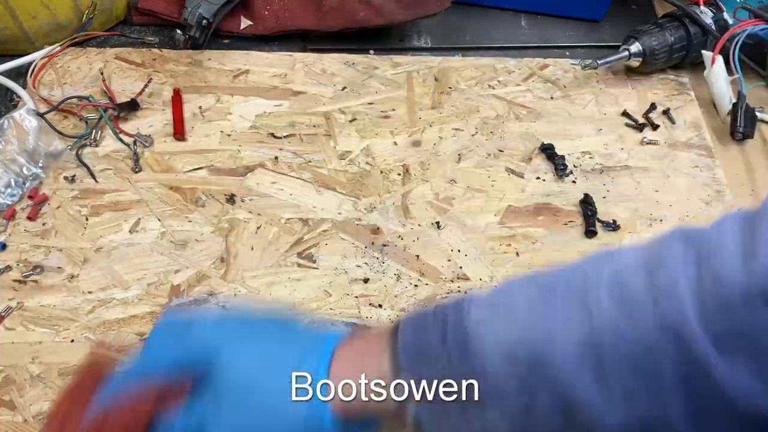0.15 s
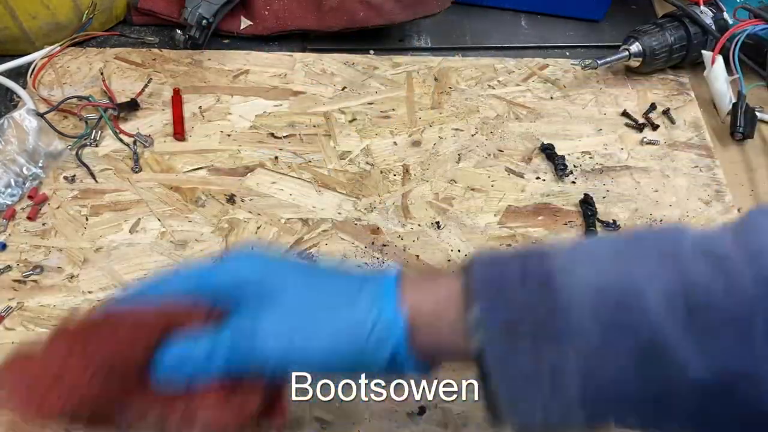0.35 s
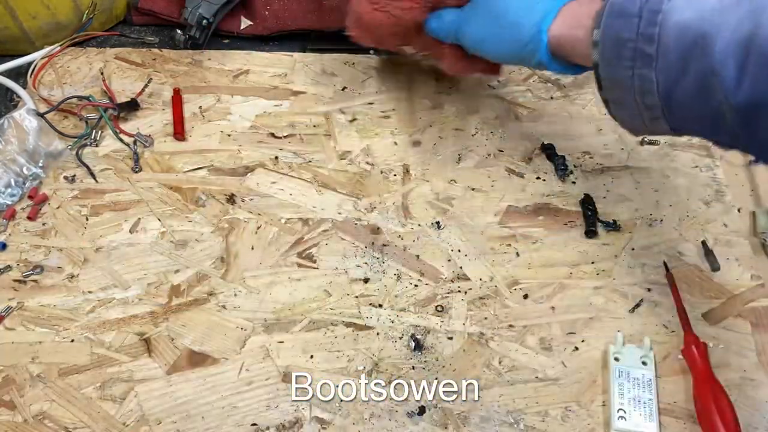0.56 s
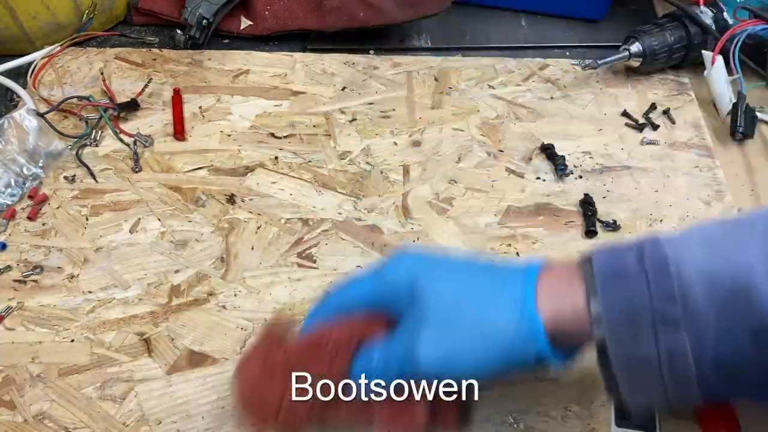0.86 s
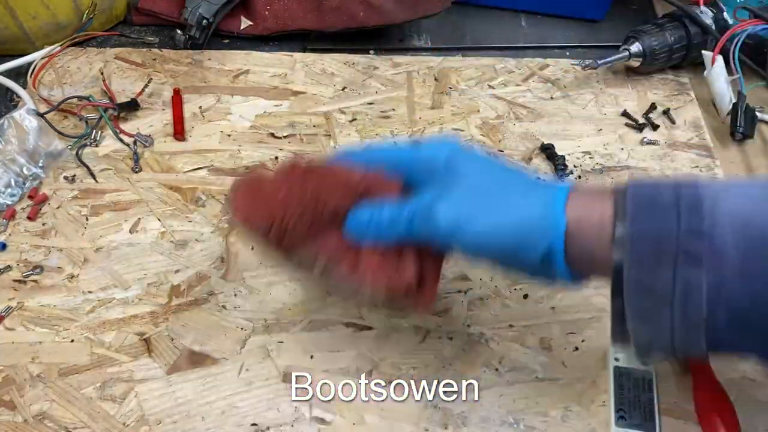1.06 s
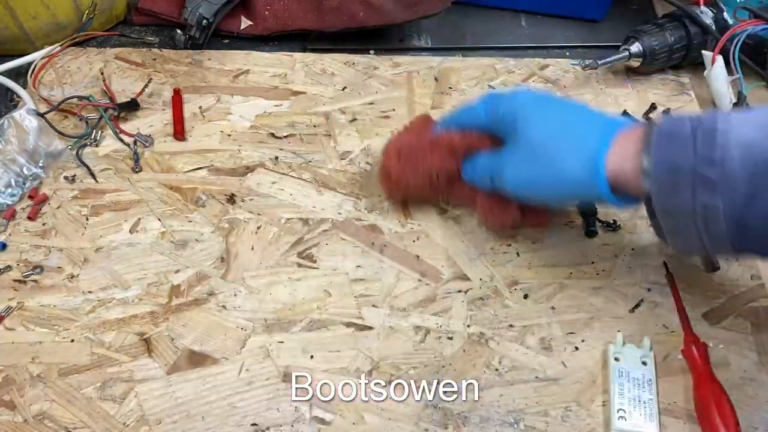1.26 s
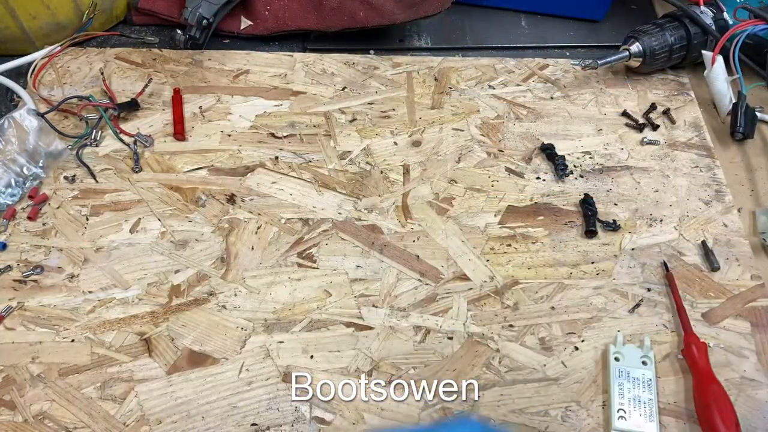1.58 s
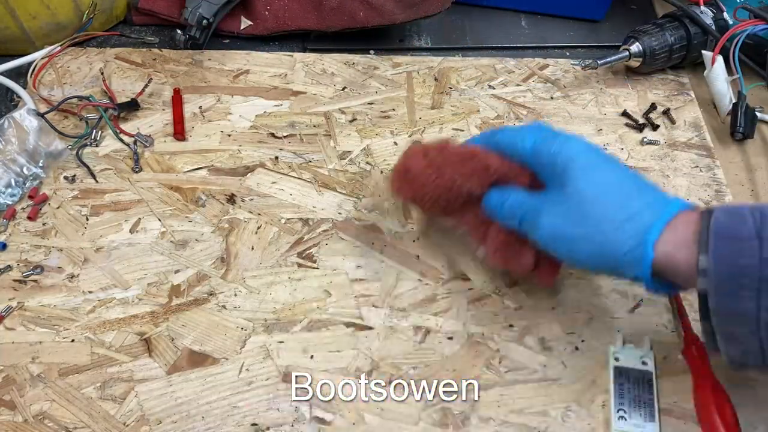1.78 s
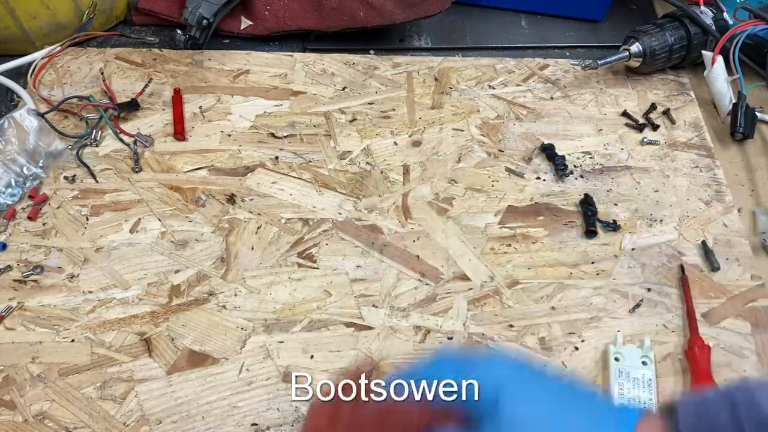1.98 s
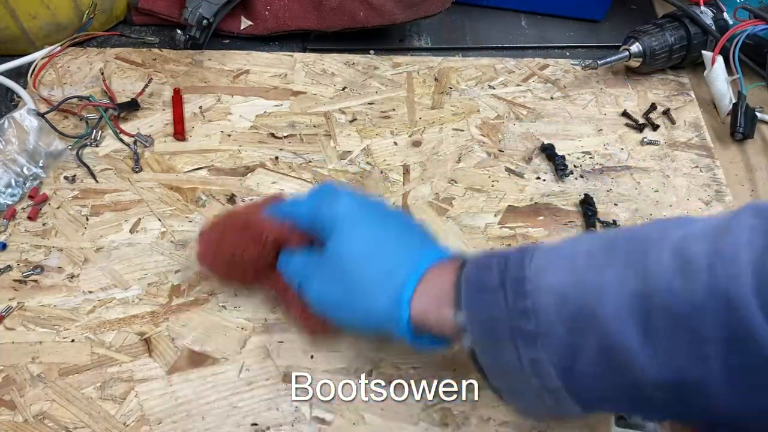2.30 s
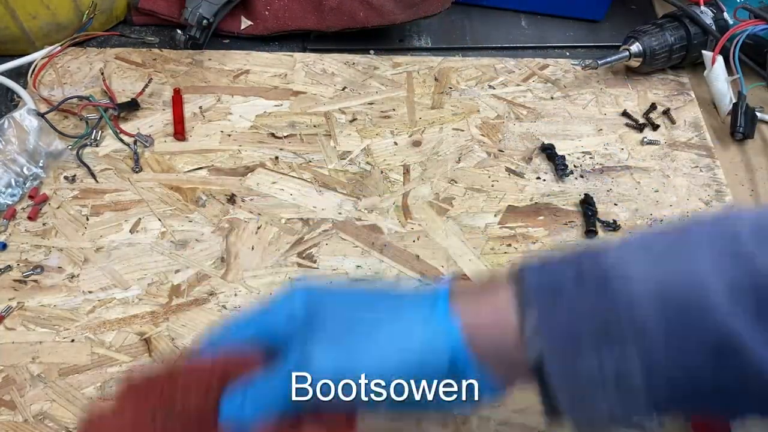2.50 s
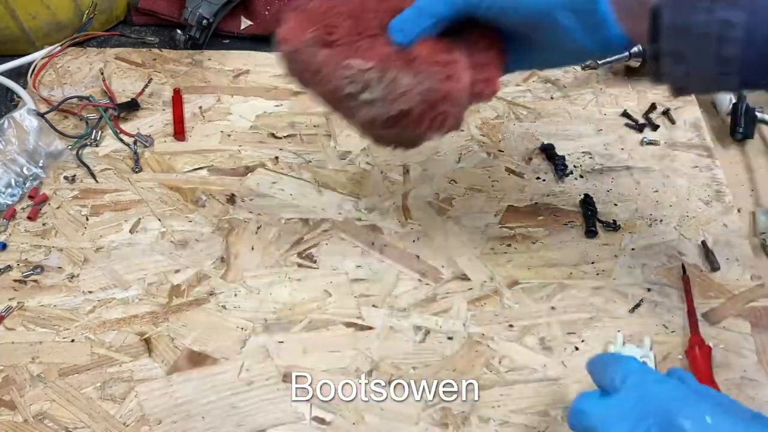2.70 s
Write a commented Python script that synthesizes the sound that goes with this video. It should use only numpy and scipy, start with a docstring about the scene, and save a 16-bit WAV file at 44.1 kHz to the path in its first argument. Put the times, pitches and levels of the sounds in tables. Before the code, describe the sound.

Brisk dry brushing of a cloth across a rough wooden board, with loose crumbs ticking

```python
"""In a small workshop with a low rumble, a gloved hand sweeps shavings off a chipboard bench, close to the microphone.
Five short strokes of a bunched rag: filtered noise rubs the board, hisses in the fibres and scrapes the heap along.
Loose crumbs tick on the wood as clicks with a brief rattle, and gated noise makes the dull thud ending each push.
Softer noise rustles as the sleeve swings back; decaying noise gives the room's answer."""
import sys
import numpy as np
from scipy import signal
from scipy.fft import rfft, irfft, next_fast_len
from scipy.io import wavfile
from scipy.ndimage import uniform_filter1d, map_coordinates

SR = 44100
rng = np.random.default_rng(int(sys.argv[2]) if len(sys.argv) > 2 else 0)


def unload_wav(signal):
    """Save mono or channel-first audio to the path in sys.argv[1] as 16-bit WAV at rate SR, clipped to [-1, 1]."""
    wavfile.write(
        sys.argv[1],
        SR,
        np.round(np.clip(np.atleast_2d(signal).T, -1, 1) * 32767).astype(np.int16),
    )


N = 125685  # samples
T = np.arange(N) / SR  # seconds


def amp(db):
    """Decibels to gain."""
    return 10 ** (np.asarray(db) / 20)


def unit(x):
    """Scale to rms 1."""
    return x / np.sqrt(np.mean(x ** 2) + 1e-20)


def along(points, hz):
    """Read (frequency [Hz], value) points on a log frequency axis."""
    frequency, value = np.transpose(points)
    return np.interp(np.log(hz + 0.0013), np.log(frequency + 1e-3), value)


def wobble(rate):
    """A smooth random curve, rate knots a second."""
    return map_coordinates(rng.standard_normal(2000), [T * rate], mode="wrap")


def filtered(x, response):
    """x times a complex response of frequency."""
    size = next_fast_len(N + 8192)
    spectrum = rfft(x, size) * response(np.fft.rfftfreq(size, 1 / SR))
    return irfft(spectrum, size)[..., :N]


def coloured(x, spectrum):
    """x shaped by the given spectrum, at rms 1."""
    return unit(filtered(x, lambda hz: amp(along(spectrum, hz))))


def gate(start, length, rise, fall):
    """Soft attack, hold and release; rise and fall are time scales in seconds."""
    opening = (1 + np.tanh((T - start) / rise / 2)) / 2
    closing = (1 - np.tanh((T - start - length) / fall / 2)) / 2
    return opening * closing


# Wavering of the rumble in the workshop: (time [s], level [dB])
RUMBLE_LEVEL = [(0, -51), (.15, -51), (.32, -43), (.46, -48), (.7, -48), (1.05, -52), (1.2, -47.5),
                (1.3, -53), (1.42, -50.5), (1.8, -49.5), (1.88, -53), (2.05, -46), (2.33, -50), (2.45, -51),
                (2.53, -44), (2.6, -54), (2.69, -51), (2.76, -63)]
# Spectrum of the rumble: (frequency [Hz], relative level [dB])
RUMBLE_COLOUR = [(20, -29), (36, -40), (45, -14.5), (53, 9.5), (60, -6.5), (72, -4.5), (86, -8),
                 (104, -12.5), (122, -5.5), (145, -22), (250, -26), (400, -36), (800, -106)]
# Spectrum of the air in the room: (frequency [Hz], relative level [dB])
AIR_COLOUR = [(30, -19), (130, 0.5), (250, -2.5), (400, -13), (700, -20), (1300, -20.5), (2500, -32),
              (6000, -36.5), (11000, -35.5), (16000, -40)]
AIR_DB = -64.5


def workshop(rumble_side_db=-21, air_side_db=-9, pan_db=-2.05):
    """A wavering low rumble under faint steady room air: coloured noise, more alike than different at the ports."""
    level = amp(np.interp(T, *np.transpose(RUMBLE_LEVEL)))
    rumble = level * coloured(rng.standard_normal((2, N)), RUMBLE_COLOUR) * amp([[0], [rumble_side_db]])
    air = amp(AIR_DB) * coloured(rng.standard_normal((2, N)), AIR_COLOUR) * amp([[0], [air_side_db]])
    mid, side = rumble + air
    return np.array([mid + side, mid - side]) * amp([[pan_db / 2], [-pan_db / 2]])


# Left-right level difference of the microphone: (frequency [Hz], share of the nominal difference)
PAN_SHAPE = [(300, -.25), (600, .5), (1050, 1.1), (2000, .65), (4000, .3), (7000, 0)]
# Lead of the left port by itself: (frequency [Hz], phase [rad])
PORT_PHASE = [(250, -0.66), (600, 0.84), (1200, -0.29), (3000, -0.088)]
SPLIT_HZ, TREBLE_LAG_S = 5000, .000217


def ports(x, pan_db, lead_ms):
    """Two microphone ports: direction sets the lead below the split; above it the left is inverted and slightly late."""
    def response(hz):
        treble = (1 + np.tanh((hz - SPLIT_HZ) / 400)) / 2
        low_cycles = (1 - treble) * hz * lead_ms / 1000
        treble_cycles = treble * (1.5 - hz * TREBLE_LAG_S)  # the half cycle inverts
        phase = 2 * np.pi * (low_cycles + treble_cycles) + along(PORT_PHASE, hz)
        half = amp(pan_db * along(PAN_SHAPE, hz) / 2)
        return np.array([half * np.exp(1j * phase), 1 / half])
    return filtered(x, response)


# Crumbs that hit the bench, click before colouring: (time [s], level [dB])
TICKS = [(0.045, -35), (0.35, -25.5), (0.384, -34), (0.521, -41), (0.675, -32.5), (1.027, -40),
         (1.074, -40), (1.1285, -35), (1.1435, -32), (1.1614, -6.5), (1.1650, -12.5), (1.6835, -37),
         (2.1745, -26), (2.5501, -17), (2.5535, -34), (2.5705, -27), (2.7878, -28)]
# Spectrum of a crumb on wood: (frequency [Hz], gain [dB])
TICK_COLOUR = [(400, -28), (1200, -14.5), (1700, -19.5), (2600, -10), (4000, -5), (5700, -12), (8000, 3),
               (10300, 6.5), (13000, -6), (16000, -3)]
TICK_RING_DB, TICK_T60_S = -6, 0.034  # rattle energy against the click; time to fall 60 dB


def crumbs():
    """Hard crumbs land: a one-sample click and a very short noise rattle, coloured together."""
    out, t = np.zeros(N + SR), T[:2048]
    for time, db in list(TICKS) + strays():
        tick = rng.standard_normal(len(t)) * amp(-60 * t / TICK_T60_S)
        tick *= amp(TICK_RING_DB) / np.linalg.norm(tick)
        tick[0] += 1
        out[round(time * SR):][:len(t)] += amp(db) * tick
    ticks = filtered(out[:N], lambda hz: amp(along(TICK_COLOUR, hz)))
    return ports(ticks, pan_db=10, lead_ms=0.022)


GRIT_PER_S, GRIT_SHARE = 1500, 0.24  # crumbs caught under the rag: mean rate, share of the power


def friction():
    """Countless fibre slips as noise, with sparser and harder catches of grit as random impulses."""
    grit = (rng.random(N) < GRIT_PER_S / SR) * rng.standard_normal(N)
    fibres = np.sqrt(1 - GRIT_SHARE) * rng.standard_normal(N)
    return fibres + np.sqrt(GRIT_SHARE) * unit(grit)


def wide(width):
    """Friction from a broad patch, a little different at each port; width is side over mid."""
    mid, side = friction(), width * friction()
    return np.array([mid + side, mid - side])


# Resonances of the bench top: (centre [Hz], width [Hz], relative level [dB])
BOARD = [(415, 17, 4.5), (1270, 31, -7.5)]
BOARD_DB = -10  # all resonances against the plain rub


def board(hz):
    """The bench top passes the rub on and adds its resonances."""
    ringing = sum(amp(db) * 1j * hz * width / (centre ** 2 - hz ** 2 + 1j * hz * width)
                  for centre, width, db in BOARD)
    return 1 + amp(BOARD_DB) * ringing


EARLY_DB, EARLY_S = -19, .012  # level of each copy; span of arrivals, from 1 ms on


def nearby(x, count=6):
    """Arm and tools throw back early copies that colour each stroke differently."""
    delays = (.001 + EARLY_S * rng.random(count)) * SR
    gains = amp(EARLY_DB) * rng.choice([-1, 1], count)
    copies = sum(gain * np.pad(x, ((0, 0), (int(delay), 0)))[:, :N] for delay, gain in zip(delays, gains))
    return (x + copies) / np.sqrt(1 + np.sum(gains ** 2))


# Strokes of the rag, levels before swell, roughness and panning: (time the rag lands [s], length [s],
# rise [s], fall [s], hiss [dB], rub [dB], mid-stroke rub centre [Hz], nominal left excess [dB], left lead [ms])
STROKES = [(0.1, 0.16, 0.013, 0.015, -39, -33.5, 1090, 6, 0.16),
           (0.776, 0.19, 0.0082, 0.014, -41.5, -36.5, 1240, 4, 0.072),
           (1.378, 0.2, 0.013, 0.013, -41.5, -36, 1410, 3, 0.048),
           (1.974, 0.11, 0.007, 0.019, -41, -37.5, 1480, 2.5, 0.046),
           (2.411, 0.079, 0.0057, .016, -40, -43, 1350, 9, 0.17)]
# Spectrum of the rub: (multiple of its centre, relative level [dB])
RUB_SHAPE = [(.1, -9.5), (.25, -10.5), (.5, -4), (.8, 1), (1.15, 1), (1.8, -9.5), (3, -19.5), (5, -28),
             (12, -62)]
# Spectrum of the hiss in the fibres: (frequency [Hz], relative level [dB])
FIBRE_COLOUR = [(200, -41), (1000, -2.5), (2800, 0), (5000, -7.5), (7000, -4), (9000, -3), (11500, -4),
                (14000, -9), (16000, -19.5)]
# Spectrum of shavings pushed ahead of the rag: (frequency [Hz], relative level [dB])
SCRAPE_COLOUR = [(1000, -30), (1700, -4), (2500, -5.5), (3600, -2), (5000, -7), (9000, -32)]
ARCH_DB, GLIDE_OCT = 7, 0.43  # weaker at both ends of a stroke; the rub climbs as the rag nears
SCRAPE_DB, SCRAPE_GROWS_DB = -4.5, 15.5  # mid-stroke, over the hiss; growth from start to end
RAG_WIDTH, FIBRE_WIDTH = .2, 0.17  # side over mid


def strokes(rub_rough_db=1.47, scrape_rough_db=2.0, hiss_rough_db=0.77, patchy_db=2):
    """Each stroke: an even hiss, a juddering rub that swells and climbs, and a scrape that grows with the heap."""
    hz, t, slips = signal.stft(filtered(wide(RAG_WIDTH), board), SR, nperseg=512)
    # random patches of time and frequency, the same at both ports
    patches = uniform_filter1d(rng.standard_normal(slips.shape[1:]), size=3, axis=0)
    patches = unit(uniform_filter1d(patches, size=5, axis=1))
    slips = slips * amp(patchy_db * patches)
    hiss = coloured(wide(FIBRE_WIDTH), FIBRE_COLOUR) * amp(hiss_rough_db * wobble(70))
    scrape = coloured(wide(RAG_WIDTH), SCRAPE_COLOUR) * amp(scrape_rough_db * wobble(60))
    judder = amp(rub_rough_db * wobble(110))
    out = np.zeros((2, N))
    for start, length, rise, fall, hiss_db, rub_db, centre_hz, pan_db, lead_ms in STROKES:
        way = np.clip((T - start) / length, 0, 1) - .5  # -0.5 to 0.5 along the stroke
        arch_db = -ARCH_DB * (2 * way) ** 2
        centre = centre_hz * 2 ** (GLIDE_OCT * np.interp(t, T, way))
        shaped = slips * amp(along(RUB_SHAPE, hz[:, None] / centre))
        rub = unit(signal.istft(shaped, SR, nperseg=512)[1][:, :N])
        rub = rub * judder * amp(rub_db + arch_db)
        heap = scrape * amp(SCRAPE_DB + SCRAPE_GROWS_DB * way + arch_db)
        bright = amp(hiss_db) * (hiss + heap)
        stroke = gate(start, length, rise, fall) * (rub + bright)
        out += ports(nearby(stroke), pan_db, lead_ms)
    return out


# Spectrum of the bench top under the hand's push: (frequency [Hz], relative level [dB])
THUD_COLOUR = [(50, -16), (110, -12.5), (180, -0.5), (370, -6), (550, -17.5), (1200, -50)]
THUD_DB, THUD_LEAD_S, THUD_S = -52, 0.034, 0.051  # level, start before a stroke's end, duration


def thuds():
    """The bench top gives dully as each push ends: low friction noise through a short gate."""
    level = sum(gate(start + length - THUD_LEAD_S, THUD_S, .008, .02) for start, length, *_ in STROKES)
    return amp(THUD_DB) * level * coloured(friction(), THUD_COLOUR)


STRAY_DB, STRAY_S, STRAY_FADE_DB_PER_S = -36.5, 0.18, 51  # mean level at first, time span, fading


def strays(count=9, scatter_db=4):
    """(time [s], level [dB]) of the small crumbs that roll on after each stroke, fading with scatter."""
    after = STRAY_S * rng.random((len(STROKES), count))
    ends = np.array([[start + length + fall] for start, length, rise, fall, *_ in STROKES])
    db = STRAY_DB - STRAY_FADE_DB_PER_S * after + scatter_db * rng.standard_normal(after.shape)
    return list(zip((ends + after).ravel(), db.ravel()))


# The arm swings back: (time [s], length [s], level before roughness and panning [dB])
SWINGS = [(0.351, 0.088, -64), (0.498, 0.5, -69), (0.99, .1, -64), (2.127, 0.26, -61), (2.505, 0.43, -62)]
# Spectrum of the sleeve's cloth: (frequency [Hz], relative level [dB])
SLEEVE_COLOUR = [(120, 5.5), (250, 1), (500, 3.5), (800, -3), (1250, 0), (2000, -4.5), (3600, -2.5),
                 (6000, -11), (11000, -14), (16000, -21)]


def sleeve(rough_db=1.7, width=1.0):
    """Cloth rustles softly while the arm swings back: wide, uneven friction noise."""
    level = sum(amp(db) * gate(start, length, 0.0028, 0.022) for start, length, db in SWINGS)
    rustle = amp(rough_db * wobble(25.46)) * coloured(wide(width), SLEEVE_COLOUR)
    return ports(level * rustle, pan_db=-2, lead_ms=0.066)


# Decay of the workshop's echo: (frequency [Hz], time to fall 60 dB [s])
ROOM_T60 = [(200, .4), (1500, 0.18), (5000, 0.3), (10000, 0.17), (16000, 0.12)]
ROOM_DB = -12


def room(x, spread_db=-5):
    """The walls' answer: noise tails, partly shared by the ports; each frequency dies at its own speed."""
    hz, t, noise = signal.stft(rng.standard_normal((3, SR // 2)), SR, nperseg=256)
    decay = amp(-60 * t / along(ROOM_T60, hz)[:, None])
    tails = signal.istft(noise * decay, SR, nperseg=256)[1]
    pair = tails[0] + amp(spread_db) * tails[1:]
    return signal.fftconvolve(x, pair / np.linalg.norm(pair[0]), axes=1)[:, :N]


def scene():
    """The work at the bench, its echo and the background."""
    near = strokes() + thuds() + crumbs() + sleeve()
    return near + amp(ROOM_DB) * room(near) + workshop()


TOP_HZ = 16200


def record(dry):
    """A very steep low-pass leaves almost nothing above the band limit."""
    return filtered(dry, lambda hz: 1 / np.sqrt(1 + (hz / TOP_HZ) ** 160))


dry = scene()
out = record(dry)
unload_wav(out)
```